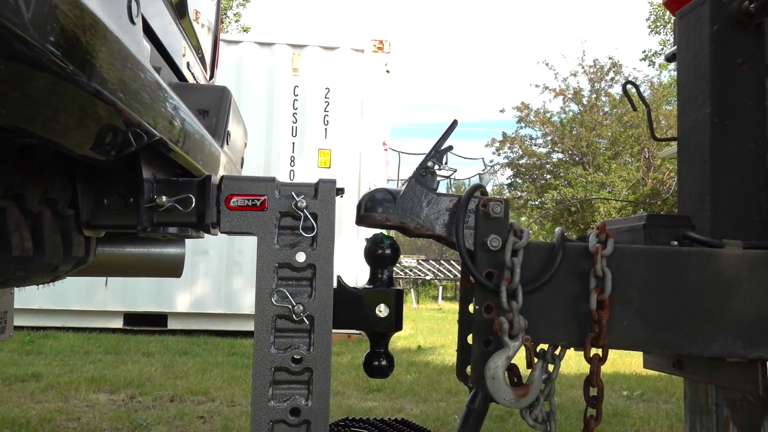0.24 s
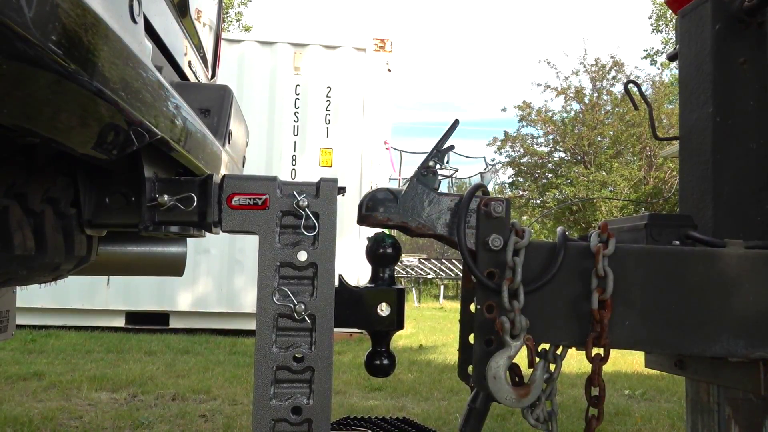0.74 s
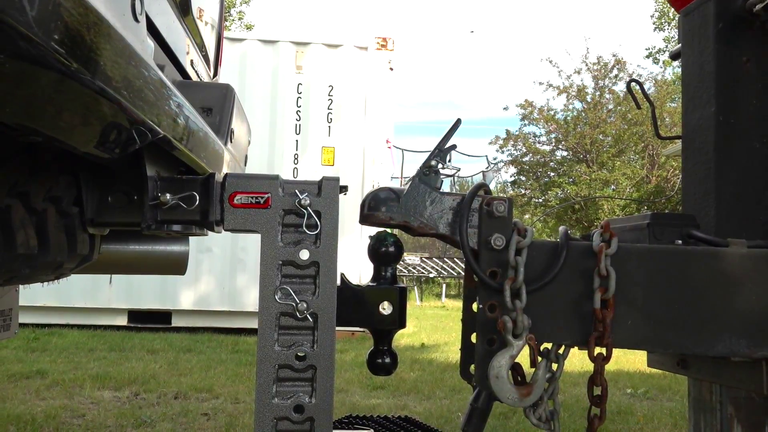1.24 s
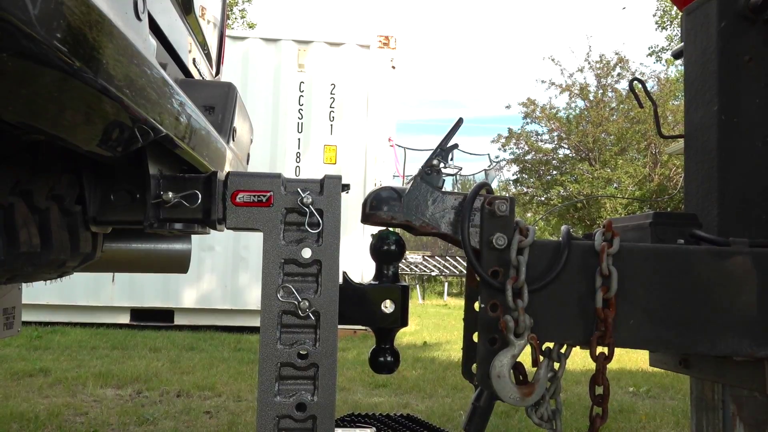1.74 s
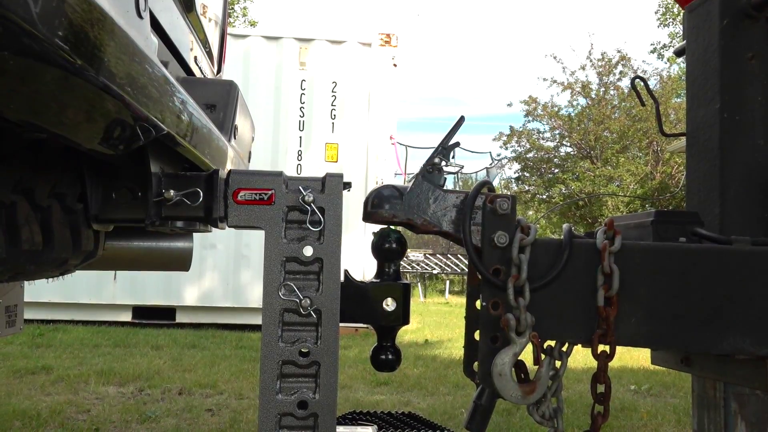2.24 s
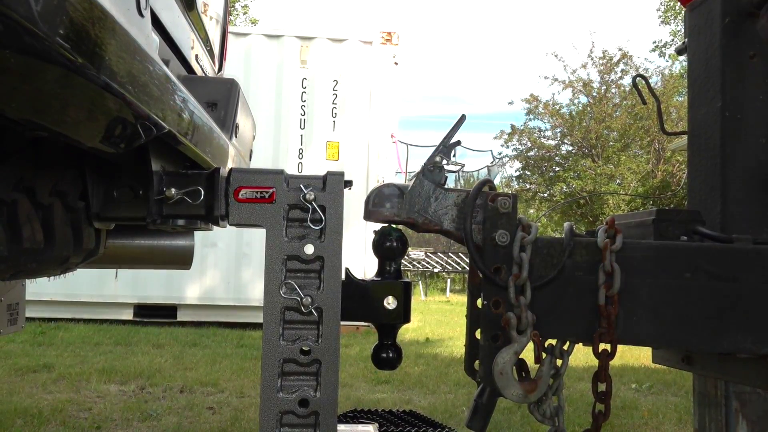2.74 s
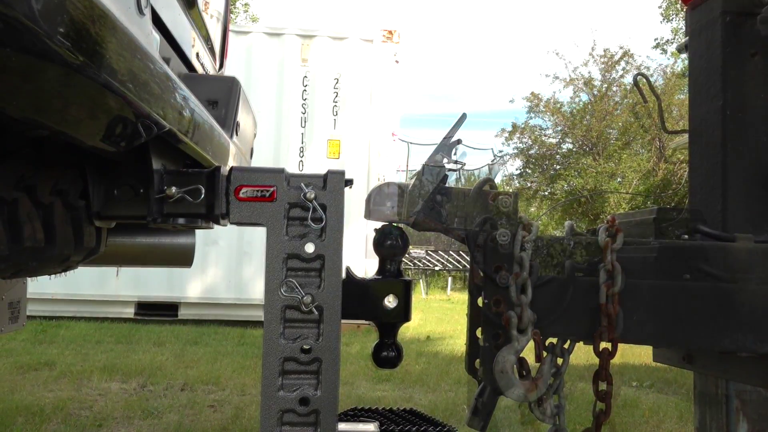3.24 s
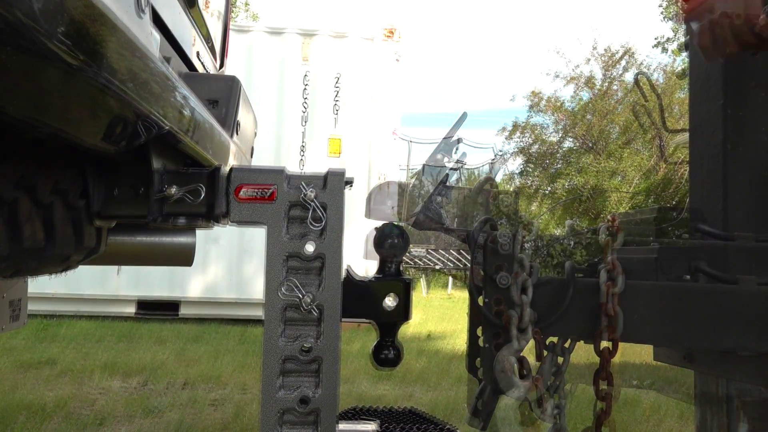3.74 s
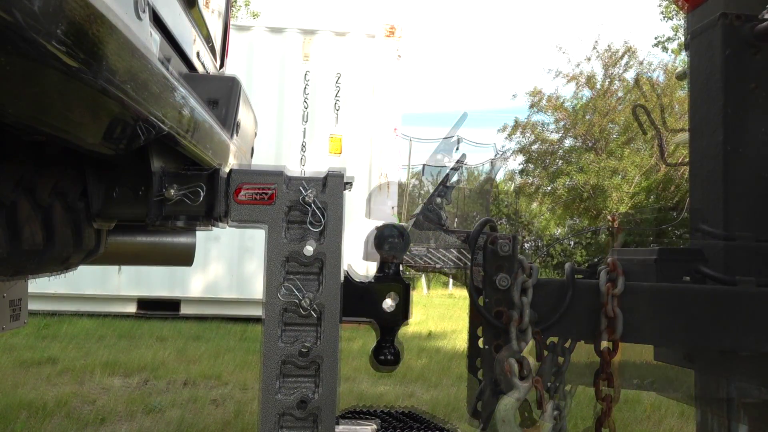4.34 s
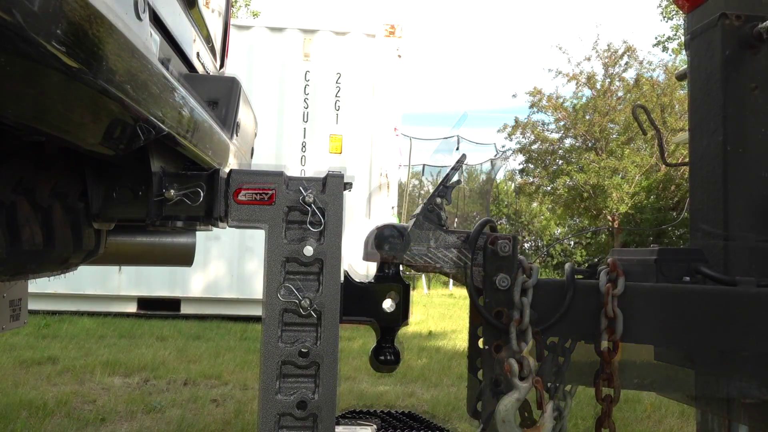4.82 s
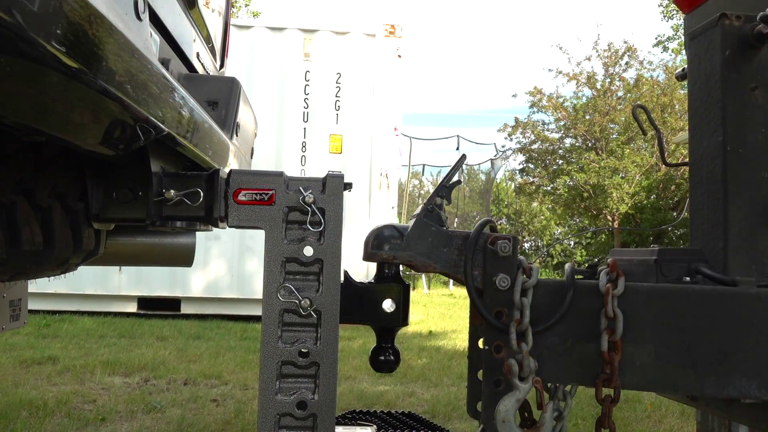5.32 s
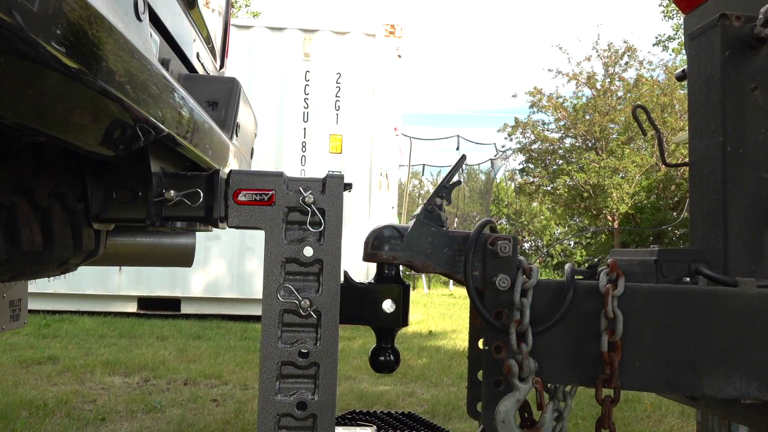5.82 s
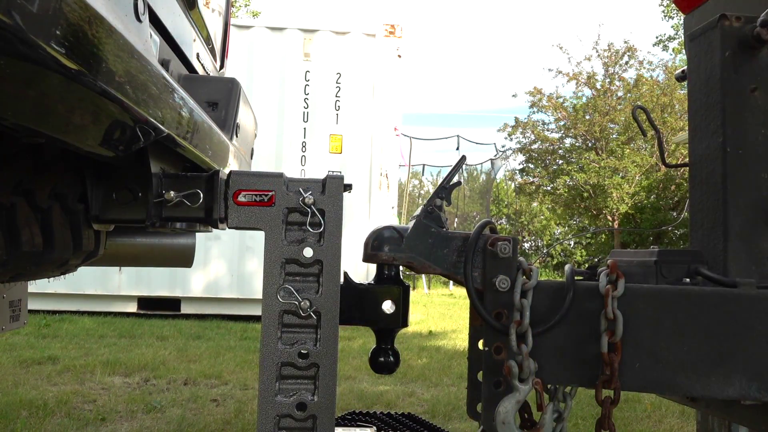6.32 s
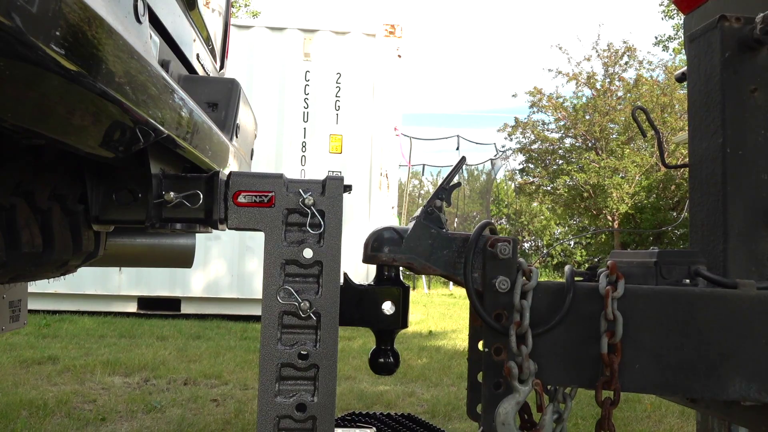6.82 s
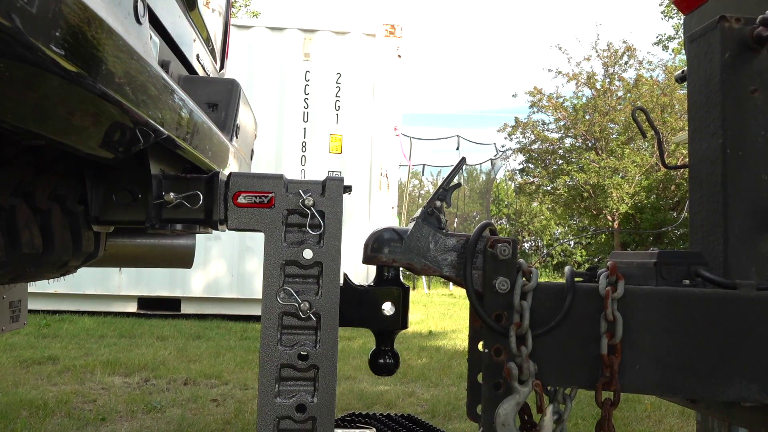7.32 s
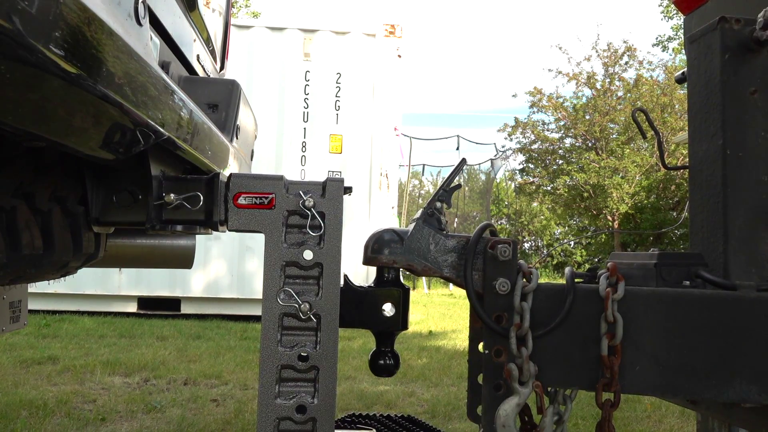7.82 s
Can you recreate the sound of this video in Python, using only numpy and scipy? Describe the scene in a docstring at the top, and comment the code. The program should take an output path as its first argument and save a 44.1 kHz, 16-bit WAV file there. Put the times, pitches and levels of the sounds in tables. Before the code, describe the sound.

Steel trailer coupler knocks, scrapes and squeaks onto a hitch ball, chain links ticking, beside a low idling truck in a yard.

```python
"""Grassy yard, a trailer coupler being cranked down onto a hitch ball close to a small stereo microphone.
Steel knocks, scrapes and rings: envelopes shape rough contact noise, heard directly and through steel modes.
Squeaks are wavering overtone stacks; chain links tick, the ground thumps softly, and a steady wash lies behind.
Beside it an eight-cylinder truck idles, its firings ringing the exhaust; two stretches of idle cross-fade."""
import sys
import numpy as np
from scipy import signal
from scipy.fft import rfft, irfft
from scipy.io import wavfile
from scipy.ndimage import uniform_filter1d

SR = 44100
rng = np.random.default_rng(int(sys.argv[2]) if len(sys.argv) > 2 else 0)


def linear_from_db(decibels):
    """Turn decibels (scalar or array-like) into linear amplitude factors; 0 gives 1."""
    return 10 ** (np.asarray(decibels, float) / 20)


def master_out(mix):
    """Clip the mix to full scale and print it as 16-bit PCM to the path in sys.argv[1]."""
    frames = np.transpose(np.atleast_2d(mix))
    ceiling = np.clip(frames, -1, 1)
    pcm = np.round(ceiling * 32767).astype(np.int16)
    wavfile.write(sys.argv[1], SR, pcm)


N = 355887  # length in samples

# Spectrum of the outdoor wash: pitch_hz [Hz], level_db [dB, relative]
YARD_SPECTRUM = [(35, -24.5), (60, -9.5), (98, -4), (176, -12), (261, -5), (822, -11), (990, -12.5),
                 (3500, -18), (14200, -43), (16000, -34.5)]
YARD_DB = -57.5  # level of the wash's middle before it drifts
SIDE_FLOOR_DB = -23  # left-right difference at all pitches, which is all the deep bass has

# Exhaust resonances: pitch_hz [Hz], width_hz [Hz], level_db [dB, relative]
EXHAUST_RESONANCES = [(40, 5.2, -4.5), (84.6, 6.8, -7.5), (98.8, 18.2, 2.5)]
# Strength of each cylinder in firing order: level_db [dB, relative]
CYLINDER_LEVELS = [5.5, -5.5, -0.5, 1.5, -4, 2, -18.5, 1]
# First engine knock on each stretch's own count: start_s [s]
FIRST_KNOCKS = [.075, .13]
CYCLES_PER_S = 5.0  # engine cycles, each of eight firings
# Where the second stretch starts to come in, and where it is alone: start_s [s], end_s [s]
CROSSFADE = [3.0, 5.0]

# Spectrum of rough steel contact: pitch_hz [Hz], level_db [dB, relative]
CONTACT_SPECTRUM = [(300, 11), (900, 2.5), (2100, 5.5), (3700, 5.5), (5200, 7.5), (6600, 9.5),
                    (10100, -4.5), (11300, -14.5), (13500, -19), (16000, -29)]
# Hands and links shifting about: time_s [s], level_db [dB, before wandering and band trims]
RUSTLE_LEVELS = [(0.0, -65), (0.9, -63), (1.12, -60), (6.88, -61.5), (8.07, -71.5)]

# Dry slides: peak_s [s], rise_s [s], fall_s [s], level_db [dB, relative, at the peak],
# low_db [dB, low band re level_db], treble_db [dB, treble re level_db]
SLIDES = [(0.029, 0.12, 0.038, -33.5, -36, -0.5), (0.605, 0.008, 0.11, -30, 0.5, -12),
          (0.742, 0.053, 0.16, -20, -57, -12.5), (0.83, 0.094, 0.094, -37.5, -43, 1.5),
          (0.896, 0.014, 0.033, -43.5, -36, -19), (1.08, 0.61, 0.059, -53, 5, -1),
          (1.988, 0.018, 0.045, -38.5, 7, -13.5), (2.483, 0.1, 0.0069, -46, -0.5, -7),
          (4.01, 0.024, 0.099, -32, -40, 5.5), (4.076, 0.12, 0.041, -32, 0.5, -13),
          (4.15, 0.18, 0.1, -35, -0.5, -10), (4.269, 0.19, 0.054, -43, 4.5, -7),
          (5.416, 0.052, 0.01, -54.5, 24, -12), (5.436, 0.036, 0.056, -28, -6, -6.5),
          (6.053, 0.0036, 0.03, -30, 1, -13), (6.479, 0.0039, 0.031, -26, 2, -7),
          (6.615, 0.055, 0.11, -23.5, -26, -12.5), (6.67, 0.063, 0.038, -16, -11.5, 1),
          (6.744, 0.018, 0.034, -26.5, -7, -3.5), (7.601, 0.55, 0.11, -49, 3.5, -9)]
SLIDE_DEPTH_DB = 20  # gained over rise_s, lost over fall_s

# Stick-slip squeaks and single high tones singing out of them: middle_s [s], length_s [s],
# start_hz [Hz, pitch before waver], end_hz [Hz, likewise], level_db [dB rms, fundamental before flutter]
SQUEAK_TONES = [(0.026, 0.071, 1385, 1538, -31.5), (0.058, 0.23, 1470, 1523, -54),
                (0.433, 0.043, 1445, 1280, -48.5), (0.639, 0.056, 1775, 1830, -40.5),
                (0.707, 0.12, 1935, 1890, -33), (0.721, .06, 3030, 3160, -31),
                (0.797, 0.041, 4020, 4050, -30.5), (0.822, 0.036, 6300, 6390, -26.5),
                (0.826, 0.06, 1544, 1556, -31), (0.826, 0.04, 4760, 4660, -21),
                (.842, .02, 1430, 1323, -26), (.843, .015, 4020, 3780, -21),
                (0.852, 0.023, 1820, 1700, -30), (0.901, 0.089, 1890, 1866, -21),
                (0.975, 0.037, 4140, 4190, -42), (1.034, 0.05, 1680, 1556, -47.5),
                (1.067, .03, 1900, 1890, -44), (1.087, .03, 1650, 1610, -48), (1.954, .04, 1446, 1520, -55),
                (3.993, 0.028, 4040, 4110, -18.5), (4.012, .03, 3310, 3270, -34),
                (4.031, 0.06, 1676, 1537, -35.5), (4.062, 0.063, 2515, 2825, -39),
                (4.11, 0.084, 1790, 1533, -36.5), (4.15, 0.038, 3030, 2890, -38.5),
                (6.52, 0.075, 1394, 1290, -34), (6.559, 0.045, 1766, 1530, -35),
                (6.586, 0.037, 1610, 1520, -33.5), (6.6, 0.056, 4080, 4030, -30),
                (6.664, 0.039, 6560, 6630, -34), (6.667, .05, 3720, 3560, -26.5),
                (6.697, .04, 1403, 1310, -31)]
OVERTONE_DB_PER_KHZ = -4  # higher tones are purer: fall per overtone, for each kHz of pitch

# Modes of coupler, jack and chain steel: pitch_hz [Hz], level_db [dB, relative, when rubbed or struck],
# t60_s [s, when free]
STEEL_MODES = [(527, -33, 0.11), (700, -38, 0.24), (907, -10, 0.16), (1030, -11, 0.12), (1360, -13.5, 0.18),
               (1890, -18, 0.034), (2161, -11.5, 0.097), (2730, -12.5, 0.017), (2960, -15.5, 0.27),
               (3065, -15.5, 0.02), (3630, -11, 0.072), (3800, -9.5, 0.014), (4087, -14.5, 0.023),
               (4482, -14, 0.034), (4646, -18.5, 0.15), (5090, -26, 0.14), (5840, -12.5, 0.27),
               (6110, -7, 0.011), (6300, -21.5, 0.021), (6560, -10, 0.016), (7000, -14, 0.31),
               (7550, -19.5, 0.042), (8500, -18, 0.071), (8850, -28, 0.08), (8980, -26, .05),
               (9980, -31.5, .04)]
# Single modes left ringing on by blows and slides: start_s [s], pitch_hz [Hz, nearest mode is used],
# level_db [dB, relative]
FREE_RINGS = [(0.033, 5840, -48.5), (1.585, 5840, -41.5), (1.59, 700, -41), (1.99, 5840, -59),
              (2.156, 7550, -45), (2.567, 6560, -39), (3.053, 5840, -56), (4.392, 3800, -35.5),
              (4.49, 2960, -48.5), (4.642, 6110, -16.5), (4.645, 3630, -26.5), (5.165, 3630, -26),
              (5.247, 3800, -12.5), (5.428, 2730, -21), (5.451, 2960, -42.5), (5.499, 1030, -42.5),
              (5.555, 3630, -43), (5.745, 3630, -35.5), (5.945, 3630, -53), (6.055, 3630, -32),
              (6.268, 3630, -54), (6.905, 3630, -37.5), (7.633, 4646, -42), (7.633, 5840, -50),
              (5.449, 7000, -45.5)]

# Knocks and clinks: start_s [s], level_db [dB, relative], low_db [dB, thud re level_db],
# treble_db [dB, treble re level_db]
BLOWS = [(0.5726, -36.5, -1, -41), (0.683, -21.5, -29, -28), (0.7472, -25.5, -41, 6),
         (0.7863, -20.5, -19, -4), (0.968, -36.5, -3, 0), (1.061, -31, -3.5, -28), (1.44, -37.5, 11, -19),
         (1.526, -47.5, 17, -10), (1.5793, -15.5, -4.5, -5), (1.8484, -30.5, -8, 0.5),
         (2.127, -43.5, -44, 7), (2.152, -36.5, -1, -9), (2.3904, -44, 4, -14), (2.5618, -38, 0, 2),
         (2.6032, -32, -29, -36), (2.677, -46, -5, 0.5), (2.702, -40.5, -13, 0), (2.722, -45.5, -10, -7),
         (2.767, -47, 7, -3), (2.7817, -36, 3, 5), (2.855, -45.5, 1, -8), (2.9216, -36.5, -2, -15),
         (3.05, -32, -1, 0.5), (3.2066, -49.5, -14, 2.5), (3.335, -51.5, -21, -9), (3.407, -45, -23, -16),
         (3.699, -30.5, -10.5, -7), (3.873, -35, -5, -17), (3.909, -22.5, -6, -12),
         (3.9616, -35.5, -12, -7.5), (4.259, -33, -10, -7), (4.3904, -36, -7, -12), (4.457, -32.5, 3, -10),
         (4.485, -31, -1, -11.5), (4.582, -39.5, 0, -3.5), (4.634, -25, -10.5, -7.5),
         (4.6504, -24.5, -13.5, -0.5), (4.712, -37, 2.5, -13), (4.733, -38, -20, -11),
         (4.7646, -28.5, -3, -10.5), (4.861, -42, -22, -9), (4.876, -41, -16, -5), (4.9504, -25.5, 4, -6),
         (5.1095, -36, -2.5, -35), (5.16, -31.5, -2.5, 3.5), (5.173, -23, -23, -26), (5.244, -21, -15, -34),
         (5.295, -41, -2, -14.5), (5.5503, -29, -6, -4), (5.6877, -36.5, -1.5, -20.5),
         (5.7404, -30.5, -2.5, -10), (5.883, -38.5, -45, -13.5), (5.904, -38.5, -3, -2),
         (5.94, -34.5, -6.5, -5.5), (6.0994, -45.5, 9, -25), (6.167, -49, -28, -18), (6.4302, -55, 9, 12.5),
         (6.449, -51, 25.5, -6), (6.535, -33, 4.5, -19), (6.552, -23.5, -8, -5), (6.5816, -17, -14, -4),
         (6.646, -14.5, -15, -3.5), (6.675, -18.5, -3, 2.5), (6.7179, -22.5, -2.5, -25),
         (6.742, -18.5, -5, 0.5), (6.8222, -36.5, -12, -7), (6.8974, -27, -7, -7.5),
         (7.0481, -33, -10, -26), (7.139, -42, -4.5, -32), (7.27, -35, -0.5, -13.5),
         (7.2843, -30.5, -11, -12), (7.316, -32.5, -21, -15), (7.6284, -25.5, 0, -28),
         (7.674, -30.5, -9, -17.5), (7.712, -29, -2, -8), (7.722, -43, -10, 2), (7.837, -39.5, -7.5, -21)]
# A heavier blow stays in contact longer: middle-band t60 [s] for a thud of HEAVY_DB and above;
# below that, each missing dB takes SHORTEN dB off the t60
KNOCK_T60_S, HEAVY_DB, SHORTEN = 0.074, -44, 0.24
CRACK_DB, CRACK_S = 4, 0.0039  # first impact: level re the blow, time constant

# Spectrum that rough contact feeds into the modes: pitch_hz [Hz], level_db [dB, relative]
MODE_DRIVE = [(300, -3.5), (10300, 5.5), (11300, 1.5), (16000, -22.5)]
# Truck and trailer bodies scatter the sound, differently to each side
SCATTER_DB, SCATTER_T60_S = -35, .055

# Dull thumps through the ground: start_s [s], level_db [dB, relative]
GROUND_THUMPS = [(1.724, -54), (2.766, -59)]

# The two microphone ports: pitch_hz [Hz], left_minus_right_db [dB], left_lead_rad [radians]
MIC_PORTS = [(150, 0, 0), (600, -2, -.2), (4000, -1.2, 0), (6600, -2, -.1), (10400, -2.6, -1.1),
             (11300, 0, -3.0), (12500, 0, -3.2), (13300, 0, -6.2)]
TOP_HZ = 15900  # the recorder's band edge


def times():
    """Sample times in s."""
    return np.arange(N) / SR


def unit(x):
    """Scale to rms 1."""
    return x / np.sqrt(np.mean(x ** 2))


def band(x, lo_hz, hi_hz):
    """Butterworth band-pass."""
    return signal.sosfilt(signal.butter(2, [lo_hz, hi_hz], "bandpass", fs=SR, output="sos"), x)


def coloured(points):
    """Noise whose spectrum joins (Hz, dB) points along a logarithmic pitch axis."""
    hz, db = np.transpose(points)
    f = np.maximum(np.arange(N // 2 + 1) * SR / N, 1)
    gain = linear_from_db(np.interp(np.log(f), np.log(hz), db))
    return irfft(rfft(rng.standard_normal(N)) * gain, N)


def walk(rate):
    """Random levels held 1 / rate s and smoothed twice over that time; spread near 1."""
    hold = int(SR / rate)
    steps = np.repeat(rng.standard_normal(N // hold + 1), hold)
    return 1.2 * uniform_filter1d(uniform_filter1d(steps, hold), hold)[:N]


def yard():
    """Outdoor wash, alike left and right in the bass, less so above; it dips 3 dB midway in the cross-fade."""
    mid, side = unit(coloured(YARD_SPECTRUM)), unit(coloured(YARD_SPECTRUM))
    hiss = linear_from_db(-3) * band(side, 7500, 16000)
    side = linear_from_db(-14.0) * band(side, 300, 18000) + linear_from_db(SIDE_FLOOR_DB) * side + hiss
    fade = np.interp(times(), CROSSFADE, [0, 1])
    dip = np.sqrt(fade ** 2 + (1 - fade) ** 2)
    return linear_from_db(YARD_DB + walk(3.2)) * dip * (mid + side * np.array([[1], [-1]]))


def idle(first_s):
    """Eight uneven firings a cycle ring the exhaust; one part knocks once a cycle."""
    s = first_s + np.arange(int(N / SR * CYCLES_PER_S) * 8) / (8 * CYCLES_PER_S)
    luck = rng.standard_normal((len(s), 3))  # timing, firing strength, knock strength
    at = np.clip(((s + 0.00077 * luck[:, 0]) * SR).astype(int), 0, N - 1)
    firings, knock = np.zeros(N), np.zeros(N)
    firings[at] = linear_from_db(np.resize(CYLINDER_LEVELS, len(s)) + 1.8 * luck[:, 1])
    knock[at[::8]] = linear_from_db(1.5 * luck[::8, 2])
    pipe = np.zeros(N)
    for hz, width, db in EXHAUST_RESONANCES:
        pipe += linear_from_db(db) * unit(band(firings, hz - width / 2, hz + width / 2))
    return linear_from_db(-70) * pipe + linear_from_db(-66.5) * unit(band(knock, 248.5, 291))


def truck():
    """One stretch of idle gives way to another in a linear cross-fade."""
    fade = np.interp(times(), CROSSFADE, [0, 1])
    return (1 - fade) * idle(FIRST_KNOCKS[0]) + fade * idle(FIRST_KNOCKS[1])


def contact_noise(grit_db=4):
    """Rough steel on steel: gritty noise in middle, low and treble bands (in that order), each rms 1."""
    grit = linear_from_db(grit_db * uniform_filter1d(rng.exponential(size=N), size=8))
    rough = coloured(CONTACT_SPECTRUM) * grit
    limits_hz = [(2000, 5500), (480, 1800), (5500, 16000)]
    return np.array([unit(band(rough, lo, hi)) for lo, hi in limits_hz])


def rustle():
    """Envelopes of hands and links shifting about, wandering in level, in the three contact bands."""
    level_db = np.interp(times(), *np.transpose(RUSTLE_LEVELS)) + 0.83 * walk(12)
    return linear_from_db(level_db + np.array([[-8], [-8], [-20]]))


def ticks(per_s=14, db=-60, spread_db=8):
    """Chain links settling: envelopes of faint, scattered ticks a few ms long."""
    hits = (rng.random(N) < per_s / SR) * linear_from_db(db + spread_db * rng.random(N))
    env = signal.lfilter([1], [1, -np.exp(-1 / (0.0028 * SR))], hits)
    return env * np.array([[1], [.2], [.4]])


def scrapes():
    """Envelopes of the slides in the contact bands: each sets in, peaks and fades, catching unevenly."""
    bands, t = np.zeros((3, N)), times()
    for s, rise, fall, db, low_db, treble_db in SLIDES:
        span = slice(max(int((s - rise) * SR), 0), int((s + 2 * fall) * SR))
        away = np.maximum((s - t[span]) / rise, (t[span] - s) / fall)
        trim_db = np.array([[0], [low_db], [treble_db]])
        bands[:, span] += linear_from_db(db - SLIDE_DEPTH_DB * away + trim_db)
    patchy = linear_from_db(3 * walk(150) + 2 * np.array([walk(60) for _ in bands]))
    return uniform_filter1d(bands, size=100) * patchy


def squeaks(waver_hz=16, flutter_db=3.5):
    """Stick-slip squeaks and high singing tones: each a wavering stack of up to five partials under a swell."""
    out = np.zeros(N)
    drift_hz = waver_hz * walk(150) + 30 * walk(1500)
    flutter = linear_from_db(flutter_db * np.array([walk(120) for _ in range(5)]))
    for mid, length, hz0, hz1, db in SQUEAK_TONES:
        i = max(int((mid - length / 2) * SR), 0)
        u = (np.arange(i, int((mid + length / 2) * SR)) / SR - mid) / length + .5  # 0 to 1 along the squeak
        span = slice(i, i + len(u))
        phase = 2 * np.pi * np.cumsum(hz0 + (hz1 - hz0) * u + drift_hz[span]) / SR
        slope_db = OVERTONE_DB_PER_KHZ * hz0 / 1000
        stack = np.zeros(len(u))
        for k in range(5):
            if (k + 1) * hz0 < 10500:
                level = linear_from_db(slope_db * k) * flutter[k, span] ** (1 + k / 4)  # higher partials flutter more
                stack += level * np.sin((k + 1) * phase)
        out[span] += linear_from_db(db) * np.sqrt(2) * np.sin(np.pi * u) ** 2 * stack
    return out


def rings():
    """The nearest mode swells within a few ms and dies away freely, its level flickering."""
    out, t, modes = np.zeros(N), np.arange(SR // 2) / SR, np.array(STEEL_MODES)
    for s, hz, db in FREE_RINGS:
        mode_hz, _, t60 = modes[np.abs(modes[:, 0] - hz).argmin()]
        env = np.minimum(t / 0.0022, 1) * linear_from_db(db - 60 * t / t60)
        tone = env * np.sin(2 * np.pi * mode_hz * t)
        i = int(s * SR)
        out[i:i + len(t)] += tone[:N - i]
    return out * linear_from_db(3 * walk(60))


def contact_band(hz):
    """Index of the contact band that drives a mode: 0 middle, 1 low, 2 treble."""
    return np.where(hz < 1800, 1, np.where(hz > 5500, 2, 0))


def knocks(scatter_db=3, thud_stretch=3.37):
    """Envelopes of the blows: three contact bands, and the push that each mode gets."""
    bands, push = np.zeros((3, N)), np.zeros((len(STEEL_MODES), N))
    driver = contact_band(np.array(STEEL_MODES)[:, 0])
    t = np.arange(SR // 4) / SR
    attack_s = np.array([[.0025], [.007], [.002]])
    luck = rng.standard_normal((len(BLOWS), len(STEEL_MODES)))
    for (s, db, low_db, treble_db), own in zip(BLOWS, luck):
        i = int(s * SR)
        now = t[:N - i]
        t60 = KNOCK_T60_S * linear_from_db(SHORTEN * min(db + low_db - HEAVY_DB, 0))
        # the thud comes late and hangs on, the treble dies first
        tails = np.array([[t60], [t60 * thud_stretch], [t60 * 0.83]])
        trim_db = np.array([[0], [low_db], [treble_db]]) - 10.5
        env = np.minimum(now / attack_s, 1) * linear_from_db(-60 * now / tails + db + trim_db)
        env *= 1 + linear_from_db(CRACK_DB) * np.exp(-now / CRACK_S)
        bands[:, i:i + len(t)] += env
        push[:, i:i + len(t)] += linear_from_db(scatter_db * own)[:, None] * env[driver]  # each blow lands elsewhere
    return bands, push


def resonate(x, hz, t60):
    """One mode as a damped complex resonator, gain 1 for steady white noise."""
    r = np.exp(-np.log(1000) / (t60 * SR))
    pole = r * np.exp(2j * np.pi * hz / SR)
    return np.sqrt(2 * (1 - r * r)) * signal.lfilter([1], [1, -pole], x).imag


def driven_modes(push, slides):
    """Steel modes driven by blows and rubbing; parts pressed together ring shorter than free ones."""
    drive, out = unit(coloured(MODE_DRIVE)), np.zeros(N)
    for (hz, db, t60), blow in zip(STEEL_MODES, push):
        rub = linear_from_db(-7.0 + 3.95 * walk(60)) * slides[contact_band(hz)]  # the contact point wanders
        out += linear_from_db(db) * resonate(linear_from_db(-4.0) * blow * drive, hz, min(t60, .06))
        out += linear_from_db(db) * resonate(rub * drive, hz, min(t60, .04))
    return out


def scatter(x):
    """Adds a decaying noise tail from 3 ms on, separate for each side, as from large bodies nearby."""
    t = np.arange(SR // 8) / SR
    tail = linear_from_db(SCATTER_DB - 60 * t / SCATTER_T60_S) * rng.standard_normal((2, len(t))) * (t > .003)
    return x + signal.fftconvolve(x[None], tail, axes=1)[:, :N]


def steel():
    """Contact noise, heard directly and through the modes that it drives, with squeaks, rings and scatter."""
    noise, slides = contact_noise(), scrapes()
    blows, push = knocks()
    direct = ((linear_from_db(-4.5) * blows + rustle() + ticks()) * noise).sum(0)
    sliding = linear_from_db(-8.5) * band((slides * noise).sum(0), 750, 19000)  # sliding has no thud under it
    out = direct + sliding + squeaks() + driven_modes(push, slides) + rings()
    return scatter(band(band(out, 390, 18000), 200, 18000))


def thumps():
    """A soft push that rings low and briefly."""
    push = np.zeros(N)
    for s, db in GROUND_THUMPS:
        push[int(s * SR)] = linear_from_db(db)
    return SR / 40 * band(push, 80, 123)


def scene():
    """Hitch steel over the idling truck and the yard."""
    return yard() + truck() + steel() + thumps()


def low_pass(x):
    """Removes everything above the highest recorded frequency."""
    return signal.sosfilt(signal.butter(12, 16120, fs=SR, output="sos"), x)


def record(dry):
    """Port spacing tilts level and phase between the sides; the top is cut."""
    hz, pan_db, lead = np.transpose(MIC_PORTS)
    f = np.log(np.maximum(np.arange(N // 2 + 1) * SR / N, 1))
    level = linear_from_db(np.interp(f, np.log(hz), pan_db) / 2)
    half = level * np.exp(.5j * np.interp(f, np.log(hz), lead))  # half the difference goes to each side
    ports = np.array([half, 1 / half]) * (f < np.log(TOP_HZ))
    mix = irfft(rfft(dry) * ports, N)
    return low_pass(mix)


dry = scene()
out = record(dry)
master_out(out)
```